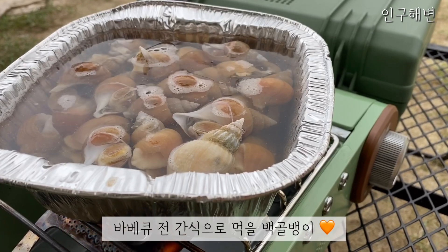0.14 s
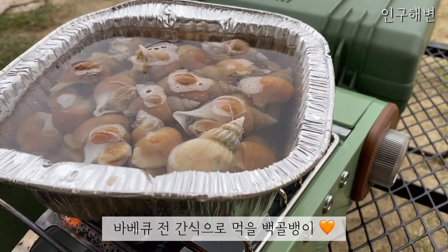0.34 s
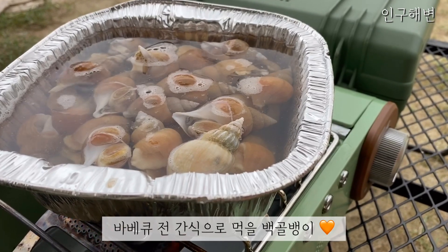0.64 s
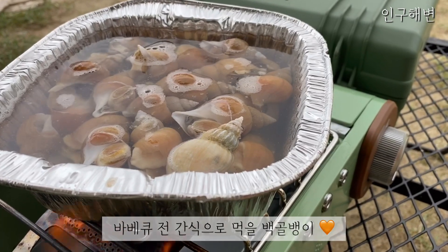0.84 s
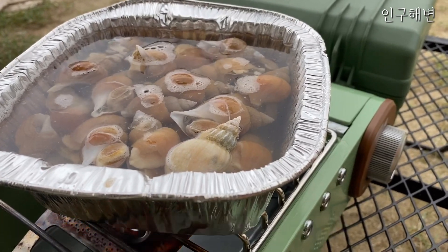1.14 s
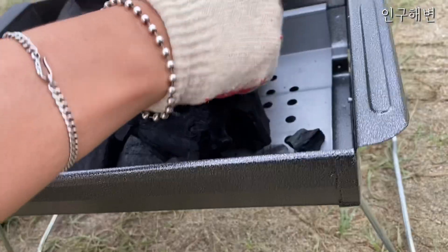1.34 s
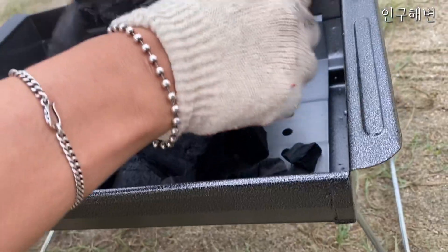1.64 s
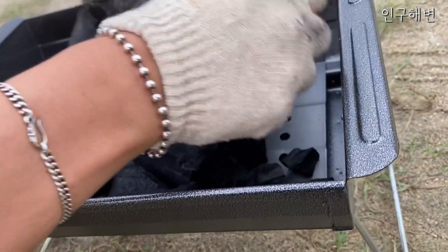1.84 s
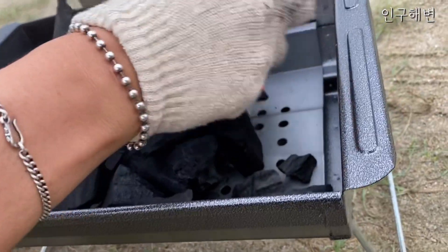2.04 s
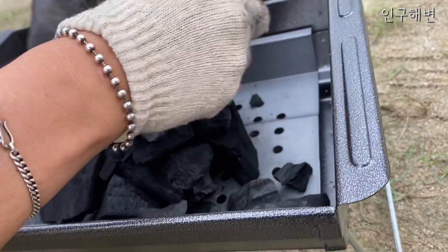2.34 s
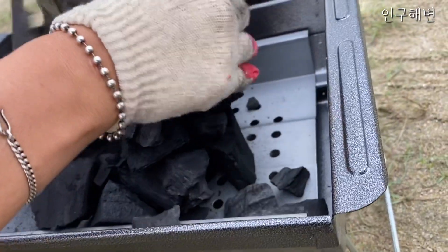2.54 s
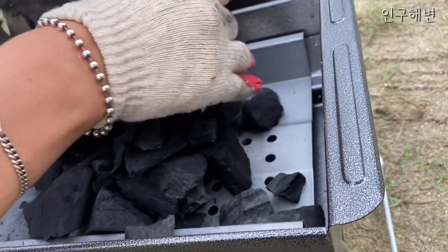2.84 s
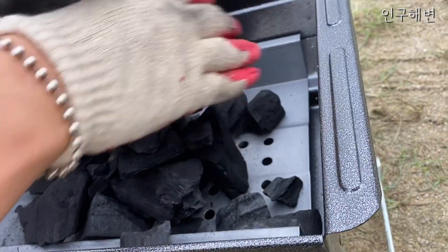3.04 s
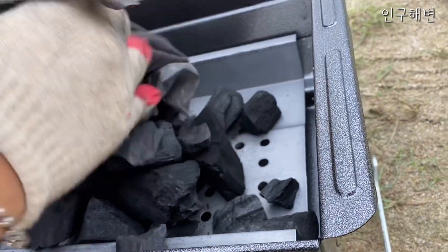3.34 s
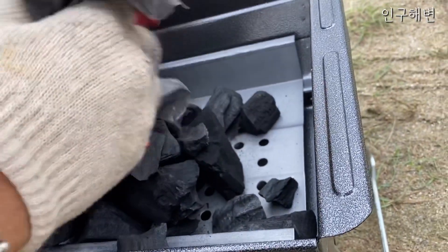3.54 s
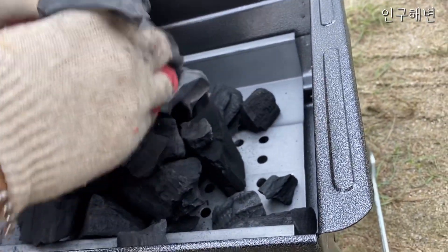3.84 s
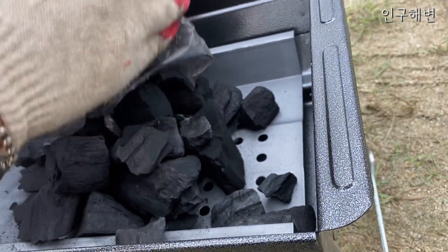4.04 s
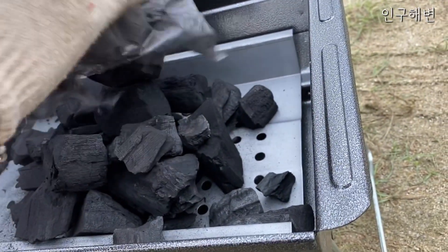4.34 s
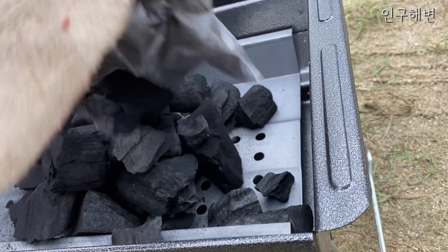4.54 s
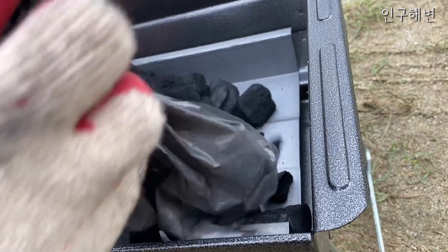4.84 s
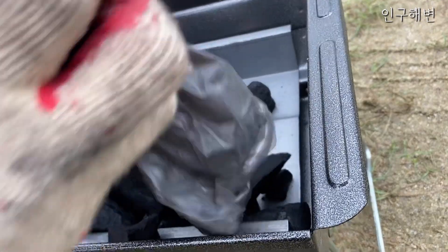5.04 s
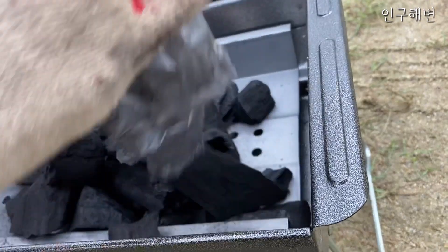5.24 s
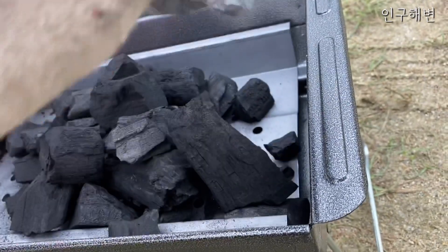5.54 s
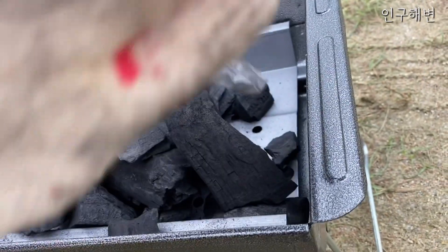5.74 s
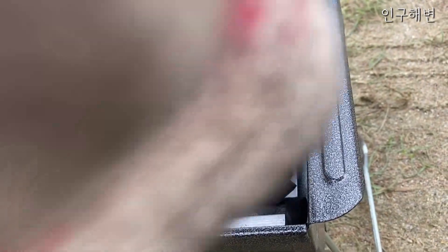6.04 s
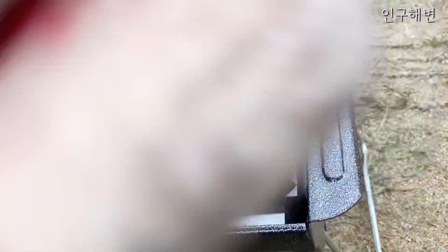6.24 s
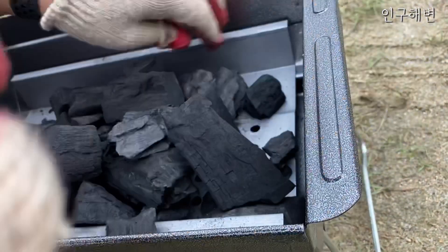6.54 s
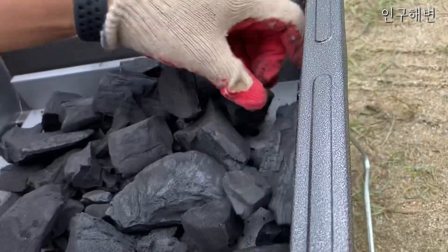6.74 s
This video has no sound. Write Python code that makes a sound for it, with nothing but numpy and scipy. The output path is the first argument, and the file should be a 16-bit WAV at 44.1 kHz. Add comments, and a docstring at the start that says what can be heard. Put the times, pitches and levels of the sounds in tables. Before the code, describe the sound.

For just over a second a gas flame rumbles and flutters with faint hiss under a simmering pan, small bubbles blipping and popping. It stops dead. Then charcoal lumps knock, scrape and clink onto one another and a ringing sheet-steel grill, in irregular clusters, while a glove and thin plastic bag rustle. Close, dry microphone in quiet outdoor air.

```python
"""Charcoal lumps land in a sheet-steel grill: noise blows and inharmonic modes knock, scrape and clink, and the
firebox rings in fixed decaying modes. Before that a gas stove, coloured noise, rumbles under a foil pan of
simmering water, sine blips and noise pops, then stops abruptly. Glove and thin plastic bag rustle in noise and
grains, with short broad noise clicks, and an abrupt broad click sounds at 6.627 s; soft low handling bumps are
sines with a rub. Quiet outdoor air is filtered noise."""
import sys
import numpy as np
from scipy import signal
from scipy.fft import rfft, irfft, next_fast_len
from scipy.io import wavfile
from scipy.ndimage import uniform_filter1d

SR = 44100
rng = np.random.default_rng(int(sys.argv[2]) if len(sys.argv) > 2 else 0)


def persist_wave(psi):
    """Save psi, clipped to +-1, as 16-bit WAV."""
    counts = np.round(np.clip(psi, -1, 1) * 32767).astype(np.int16)
    wavfile.write(sys.argv[1], SR, np.atleast_2d(counts).T)


N = 304371
TIME = np.arange(N) / SR
AGE = TIME[:SR * 3 // 5]  # time since the onset of one event [s]
STOVE_END_S = 1.19


def undb(db):
    """Decibels to gain."""
    return 10 ** (np.asarray(db) / 20)


def unit(x):
    """Scale to rms 1."""
    return x / np.sqrt(np.mean(x ** 2))


def peak(x, db, size=256):
    """Scale so that the loudest window of size samples has this rms level."""
    return x * undb(db) / np.sqrt(uniform_filter1d(x ** 2, size).max())


def curve(rows):
    """Gain over time from (time [s], level [dB]) rows."""
    return undb(np.interp(TIME, *np.transpose(rows)))


def decay(t60_s, age_s=AGE):
    """Exponential decay, 60 dB down at t60."""
    return np.exp(-np.log(1000) * age_s / t60_s)


def add(out, start_s, x):
    """Mix x into out at start_s."""
    i = max(int(start_s * SR), 0)
    out[i:i + len(x)] += x[:N - i]


def band(x, lo_hz, hi_hz, order=2):
    """Butterworth band-pass, at least an octave wide."""
    top_hz = min(hi_hz, SR / 2 - 1000)
    edges_hz = [min(lo_hz, top_hz / 2), top_hz]
    return signal.sosfilt(signal.butter(order, edges_hz, "band", fs=SR, output="sos"), x)


def colour(x, points):
    """Minimum-phase filter through (frequency [Hz], gain [dB]) points."""
    n = 2 * next_fast_len(len(x) // 2 + 2048)
    hz, db = np.transpose(points)
    bins_hz = np.arange(n // 2 + 1) * SR / n
    gain = undb(np.interp(np.log(bins_hz + 1), np.log(hz), db))
    # fold the cepstrum to make the response causal
    cepstrum = irfft(np.log(gain))
    cepstrum[1:n // 2] *= 2
    cepstrum[n // 2 + 1:] = 0
    return irfft(rfft(x, n) * np.exp(rfft(cepstrum)))[:len(x)]


def walk(rate_hz):
    """Random wander of rms 1, linear between random knots."""
    knots_s = np.arange(0, N / SR + 1, 1 / rate_hz)
    return unit(np.interp(TIME, knots_s, rng.standard_normal(len(knots_s))))


def noise():
    """White noise over the whole scene."""
    return rng.standard_normal(N)


def hiss():
    """White noise as long as one event."""
    return rng.standard_normal(len(AGE))


def grains(rate_hz, spread_db):
    """Random tiny clicks, most of them faint and a few strong."""
    size = undb(spread_db * np.minimum(rng.exponential(size=N), 5))
    return unit((rng.random(N) < rate_hz / SR) * size * noise())


def ticks(rows, t60_s, spread, tail_db, tail_t60_s):
    """Short broad noise clicks around a centre frequency, each with a faint tail."""
    out = np.zeros(N)
    for start_s, db, hz in rows:
        click = hiss() * (decay(t60_s) + undb(tail_db) * decay(tail_t60_s))
        add(out, start_s, peak(band(click, hz / spread, hz * spread), db, size=64))
    return out


def moves(rows, attack_s, release_s):
    """Gain of movements: each swells, holds and dies away; overlaps add in power."""
    power = np.zeros(N)
    for start_s, length_s, db in rows:
        swell = np.clip(1 + (TIME - start_s) / attack_s, 0, 1)
        settle = np.exp(-np.maximum(TIME - start_s - length_s, 0) / release_s)
        power += (undb(db) * swell * settle) ** 2
    return np.sqrt(power)


# spectrum of outdoor air: (frequency [Hz], gain [dB])
AIR_COLOUR = [(40, -2), (130, 9), (400, 1.5), (800, -8.5), (1800, -13), (5000, -19.5), (13700, -19.5),
              (16000, -17)]
# rumble of moving air at the microphone, before its flutter: (time [s], level [dB])
DRAUGHT_LEVEL = [(1.2, -67.5), (6.28, -61.5), (6.4, -46.5), (6.9, -56.5)]


def outdoors(air_db=-65.5):
    """Quiet distant air drifts slightly in level; a low draught flutters."""
    air = unit(colour(noise(), AIR_COLOUR)) * undb(air_db + walk(2.46) / 2)
    draught = unit(band(noise(), 56, 175)) * curve(DRAUGHT_LEVEL) * undb(2 * walk(19))
    return air + draught


# spectrum of flame and jet: (frequency [Hz], gain [dB])
STOVE_COLOUR = [(40, -19), (65, -5), (200, 0), (320, -12), (550, -19), (1200, -23.5), (4200, -22.5),
                (5600, -32), (7000, -34), (7400, -27.5), (8000, -34.5), (15000, -34)]


def stove(level_db=-46, flutter_db=2, flutter_hz=21.32, stop_s=0.0053):
    """The flame flutters below 450 Hz and the gas jet hisses steadily above."""
    flame = unit(colour(noise(), STOVE_COLOUR)) * undb(level_db)
    roar = signal.sosfiltfilt(signal.butter(2, 450, fs=SR, output="sos"), flame)
    jet = flame - roar
    alight = np.clip((STOVE_END_S - TIME) / stop_s, 0, 1)
    return (jet + roar * undb(flutter_db * walk(flutter_hz))) * alight


def simmer(max_db=-45.5, range_db=14, lo_hz=400, hi_hz=3500, burst_s=0.035, bursts=60, bubbles=7):
    """Bubbles surface in bursts around a shared pitch; each rings briefly, rising slightly."""
    out = np.zeros(N)
    for when, pitch in rng.random((bursts, 2)):
        for lag, detune, faint in rng.random((bubbles, 3)):
            hz = lo_hz * (hi_hz / lo_hz) ** pitch * 2 ** (detune - 0.5)
            t60_s = 14 / hz  # 60 dB down in about 14 cycles
            phase = 2 * np.pi * hz * AGE * (1 + AGE / t60_s / 20)
            start_s = when * (STOVE_END_S - burst_s) + lag * burst_s
            add(out, start_s, np.sin(phase) * decay(t60_s) * undb(max_db - range_db * faint))
    return out


# bubbles popping in the foil pan: (time [s], level [dB], centre [Hz])
PAN_POPS = [(0.020, -41.5, 2200), (0.153, -40.5, 2080), (0.178, -41.5, 1680), (0.209, -48, 4260),
            (0.2785, -30, 6800), (0.3365, -37, 1680), (0.354, -36.5, 2300), (0.511, -39, 4550),
            (0.63, -45.5, 1900), (1.160, -44, 6000)]


def pops():
    """Bubbles burst as short broad clicks."""
    return ticks(PAN_POPS, t60_s=0.037, spread=1.77, tail_db=-26, tail_t60_s=0.13)


# spectrum of the sliding rustle: (frequency [Hz], gain [dB])
SLIDE_COLOUR = [(240, -7), (400, 9), (826, 2), (1900, 1), (3020, 3.5), (4380, -1.5), (10000, -1),
                (13500, 5), (16000, -5)]
# strokes of glove or bag, rustling swells: (start [s], length [s], level [dB])
RUSTLE_STROKES = [(1.24, 0.62, -59.5), (3.09, 0.25, -56), (3.46, 0.47, -61.5), (3.66, 0.13, -58),
                  (4.12, 0.062, -57.5), (4.3, 0.3, -56), (4.67, 0.16, -53.5), (5.2, 0.11, -62),
                  (5.74, 0.097, -65.5), (6.04, 0.19, -60), (6.32, 0.08, -55), (6.67, 0.21, -54.5)]


def rustle(smooth_db=-4, flick_db=8, flick_t60_s=0.0051, held_db=-68, held_end_s=5.4):
    """Thin plastic and knitted cotton slide with a shifting hiss; folds buckle in irregular flurries."""
    edges_hz = np.geomspace(900, 17000, 9)
    creases = np.zeros(N)
    for lo_hz, hi_hz in zip(edges_hz, edges_hz[1:]):
        # each band wanders by itself as the film bends
        bend_db = 2 * walk(50) + 1.5 * walk(10)
        creases += band(grains(rate_hz=2500, spread_db=4.2), lo_hz, hi_hz) * undb(bend_db)
    slide = unit(colour(creases + undb(smooth_db) * noise(), SLIDE_COLOUR))
    flicks_hz = 16 * np.exp(walk(10))
    flicks = (rng.random(N) < flicks_hz / SR) * rng.random(N)
    folds = signal.fftconvolve(flicks, decay(flick_t60_s))[:N]
    buckle = undb(flick_db) * folds * unit(band(noise(), 4000, 21050))
    strokes = moves(RUSTLE_STROKES, attack_s=0.069, release_s=0.1)
    # the bag is never quite still in the hand until it is put aside
    held = undb(held_db + walk(30)) * (TIME < held_end_s)
    return (slide + buckle) * np.hypot(strokes, held) * undb(walk(45))


# soft handling bumps: (time [s], level [dB])
HAND_BUMPS = [(2.262, -50.5), (2.45, -45), (2.466, -49.5), (2.585, -52), (2.917, -50), (3.17, -52.5),
              (5.87, -52), (6.068, -50), (6.189, -45), (6.366, -38), (6.381, -41), (6.438, -44),
              (6.479, -42), (6.551, -44)]


def bumps(hz=190, length_s=0.006, spread=1.86, rub_db=-3):
    """Padded contacts swell and die within a few low cycles, with a dull rub of cloth."""
    out = np.zeros(N)
    for start_s, db in HAND_BUMPS:
        pitch_hz = hz * spread ** (rng.random() - 0.5)
        rub = undb(rub_db) * unit(band(hiss(), hz / spread, hz * spread))
        thud = np.sin(2 * np.pi * pitch_hz * AGE) + rub
        add(out, start_s - length_s / 2, peak(thud * AGE * np.exp(-AGE / length_s), db))
    return out


# short broad clicks: (time [s], level [dB], centre [Hz])
CLICKS = [(2.412, -54, 9000), (2.939, -45, 11300), (3.1324, -44, 8600), (3.2116, -41, 12300),
          (4.1407, -48, 8000), (4.156, -40.5, 11100), (4.539, -38.5, 11100), (4.5988, -38.5, 12400),
          (4.925, -53, 15000), (4.967, -40, 8400), (5.5076, -48.5, 8000), (6.039, -58, 9000),
          (6.627, -37.5, 3390)]


def clicks():
    """Abrupt noise bursts, each with a faint longer tail."""
    return ticks(CLICKS, t60_s=0.01, spread=2.2, tail_db=-19, tail_t60_s=0.07)


# modes of the steel firebox: (frequency [Hz])
FIREBOX_HZ = [432, 511, 635, 762, 964, 1455, 1625, 1768, 2303, 2625, 3104, 3472, 3612, 4017, 4352, 4802]


def firebox(lowest_t60_s=0.38):
    """Complex ring of each steel mode, one row per mode; higher ones die sooner and are fainter."""
    rings = []
    for hz in FIREBOX_HZ:
        ring = np.exp(2j * np.pi * hz * AGE) * decay(lowest_t60_s * np.cbrt(FIREBOX_HZ[0] / hz))
        rings.append(ring / (1 + (hz / 4000) ** 2))
    return np.array(rings)


# spectrum of a blow: (frequency [Hz], gain [dB])
BLOW_COLOUR = [(100, -26), (280, -6), (420, -1), (850, 1.5), (1300, -1), (1900, -4), (2400, -1), (3300, -3),
               (4300, -10), (9000, -15), (13500, -14), (16000, -23)]


def rough_contact(x):
    """Colour an excitation as rough charcoal faces do."""
    return colour(x, BLOW_COLOUR)


# a lump is dragged over the pile: (start [s], length [s], level [dB])
LUMP_DRAGS = [(1.43, 0.1, -52), (3.3, 0.064, -58.5), (6.47, 0.025, -43.5), (6.65, 0.071, -54)]


def scrape(flutter_db=2, steel_db=-15):
    """Rough faces catch and slip; every slip rings briefly in the pile, longer and fainter in the steel."""
    slips = grains(rate_hz=1100, spread_db=2.8) + noise() / 2
    steel = firebox().imag.sum(0)
    effort = moves(LUMP_DRAGS, attack_s=0.044, release_s=0.025) * undb(flutter_db * walk(29))
    pile = unit(rough_contact(signal.fftconvolve(slips, hiss() * decay(0.012))[:N])) * effort
    ring = signal.fftconvolve(slips * effort, steel / np.linalg.norm(steel))[:N]
    return band(pile + undb(steel_db) * ring, 310, 6700, order=1)


def dense_modes(t60_at_2khz_s, lo_hz, hi_hz, count):
    """Dense inharmonic modes, drawn anew for every event; the higher ones die sooner."""
    age = AGE[:len(AGE) // 2]
    steps = (np.arange(count) + rng.random(count)) / count
    hz = lo_hz * (hi_hz / lo_hz) ** steps[:, None]
    tones = np.sin(2 * np.pi * (hz * age + rng.random((count, 1))))
    rings = tones * decay(t60_at_2khz_s / np.sqrt(hz / 2000), age)
    return np.pad(rings.sum(0), (0, len(AGE) - len(age)))


# clear-pitched rings of lumps or of the steel firebox:
# (time [s], level [dB], lower mode [Hz], upper mode [Hz], t60 [s])
PITCHED_RINGS = [(1.233, -43, 1700, 2830, 0.25), (1.273, -43.5, 1696, 2880, 0.15),
                 (1.303, -48.5, 1008, 1386, 0.67), (1.668, -45.5, 519, 1010, 0.51),
                 (1.709, -44, 766, 1036, 0.12), (1.846, -53.5, 3250, 3500, 0.11),
                 (2.657, -39, 826, 1015, 0.082), (2.66, -38, 1620, 2120, 0.18),
                 (4.886, -49.5, 3140, 3520, 0.11), (5.421, -37, 1045, 1710, 0.073),
                 (5.748, -58, 1090, 1603, 0.5), (6.44, -32.5, 604, 870, 0.027),
                 (6.471, -34, 840, 965, 0.027), (6.724, -42.5, 422, 910, 0.45)]


def pitched_rings(rough=0.44, side_db=-4):
    """Two main modes waver in phase and level over a weaker cluster of dense modes."""
    out = np.zeros(N)
    for start_s, db, lower_hz, upper_hz, t60_s in PITCHED_RINGS:
        ring = np.zeros(len(AGE))
        for hz in (lower_hz, upper_hz):
            phase_wobble = rough * walk(160)[:len(AGE)]
            level_wobble = 1 + rough * walk(160)[:len(AGE)]
            ring += np.sin(2 * np.pi * hz * AGE + phase_wobble) * level_wobble
        ring *= decay(t60_s)
        cluster = dense_modes(t60_s, lower_hz / np.sqrt(2), upper_hz * np.sqrt(2), count=10)
        both = peak(ring, 0) + peak(cluster, side_db)
        add(out, start_s, peak(band(both, 250, 4200, order=4), db))
    return out


def rock(x, count=3, mean_gap_s=0.0051, loss_db=-13):
    """A lump rocks onto several points before it lies still, each contact weaker than the last."""
    out = x.copy()
    lags_s = np.cumsum(mean_gap_s * (0.5 + rng.random(count)))
    for k, lag_s in enumerate(lags_s, 1):
        i = max(int(lag_s * SR), 1)
        out[i:] += undb(k * loss_db) * x[:-i]
    return out


# knocks, mostly lumps landing on the pile and the steel; at 6.627 s an abrupt broad click:
# (time [s], knock level [dB], clack over the knock [dB], crack over the knock [dB])
KNOCK_BLOWS = [(1.234, -51.5, 11, 4), (1.298, -46, -2, -1), (1.432, -46.5, -7, -9),
               (1.495, -44, -2.5, -7.5), (1.516, -48, -6, -11), (1.558, -49.5, -0.5, 3),
               (1.585, -50, 6.5, -1), (1.628, -62, 13, 13), (1.667, -47, 1, -7.5), (1.709, -41.5, -4, -18),
               (1.893, -66.5, 17, 19), (2.001, -72.5, 15.5, 20), (2.481, -58.5, -10, -9),
               (2.656, -36, -3, -7.5), (2.667, -43.5, 5.5, -0.5), (2.783, -46, -10.5, -6),
               (2.806, -48.5, 0, -14), (2.819, -40.5, -4, 3.5), (3.294, -49.5, -7, -5),
               (3.363, -54, -1, -6), (3.698, -53.5, -6, -7), (4.055, -55, -4.5, 2), (4.809, -44, -10, -8),
               (4.821, -40.5, -6.5, -24), (5.217, -50.5, -9, -7), (5.317, -53, 1.5, -8),
               (5.344, -51, -6, -5), (5.42, -43.5, 7, -4), (5.572, -51.5, -3.5, -7), (5.745, -53, 0.5, -19),
               (5.766, -62.5, 10, 15.5), (6.312, -42.5, -8.5, -8), (6.392, -41, -1, -25),
               (6.438, -41.5, -2.5, -2.5), (6.47, -47.5, 9.5, -1), (6.479, -56, 16.5, 10),
               (6.627, -45, -0.5, 2.5), (6.72, -34.5, 5, -4), (6.739, -41.5, -25, -16),
               (6.805, -38, -4.5, -8)]


def knocks(t60_s=0.16, strike_db=1, strike_t60_s=0.082, clink_db=-4, steel_db=-9, tail_db=-16,
           tail_t60_s=0.74, glassy_db=-9.5, scatter_db=3, rise_s=0.00012):
    """A rough face strikes and crunches, the lump clinks and the firebox rings on."""
    out = np.zeros(N)
    modes = firebox()
    contact = decay(t60_s) + undb(strike_db) * decay(strike_t60_s)
    for start_s, db, clack_db, crack_db in KNOCK_BLOWS:
        # each blow drives the steel's modes in its own mix
        mode_gain = undb(scatter_db * rng.standard_normal(len(modes)))
        mix = mode_gain * np.exp(2j * np.pi * rng.random(len(modes)))
        steel = peak((mix @ modes).imag, steel_db)
        crunch = peak(rough_contact(hiss() * contact), 0)
        tail = rough_contact(hiss() * decay(tail_t60_s))
        clatter = peak(band(tail, 160, 7400, order=1), tail_db)
        clink = peak(band(dense_modes(t60_s, 700, 6000, count=22), 1440, 3700, order=1), clink_db)
        # a dull contact pushes for longer than a hard one
        push = 1 - np.exp(-AGE * undb(clack_db) / rise_s)
        blow = rock(crunch + clink + steel + clatter) * push
        # brittle edges ring in a few glassy modes
        glassy = peak(dense_modes(t60_s, 5000, 14000, count=10), glassy_db)
        crack = peak(rough_contact(hiss() * contact), 0) + clatter + glassy
        # a heavy lump knocks low, a hard edge clacks and cracks high
        add(out, start_s, peak(band(blow, 150, 1250, order=4), db))
        add(out, start_s, peak(band(blow, 1450, 5600, order=4), db + clack_db))
        add(out, start_s, peak(band(crack, 5600, 15000, order=3), db + crack_db))
    return out


def scene():
    """All sources, close and dry, in one channel."""
    cooking = stove() + simmer() + pops()
    handling = (rustle() + scrape()) * (TIME > STOVE_END_S) + bumps() + clicks()
    charcoal = pitched_rings() + knocks()
    return (outdoors() + cooking + handling + charcoal)[None]


def record(dry):
    """The microphone sheds the deep bass and cuts the top."""
    thin = signal.sosfilt(signal.butter(3, 45, "high", fs=SR, output="sos"), dry)
    return signal.sosfilt(signal.ellip(8, 0.2, 70, 15700, fs=SR, output="sos"), thin)


dry = scene()
out = record(dry)
persist_wave(out)
```